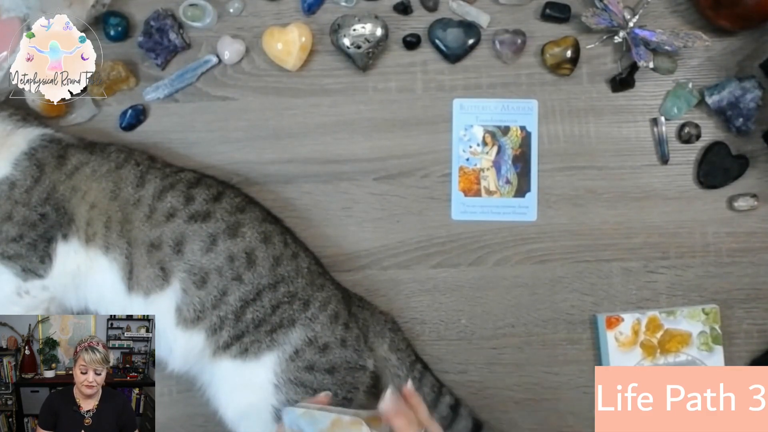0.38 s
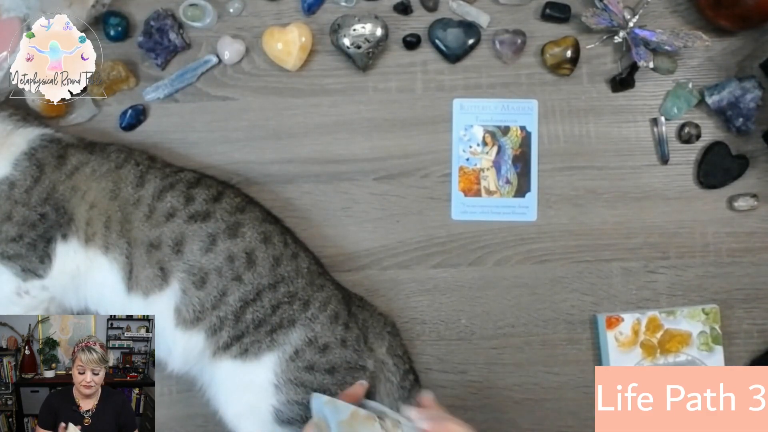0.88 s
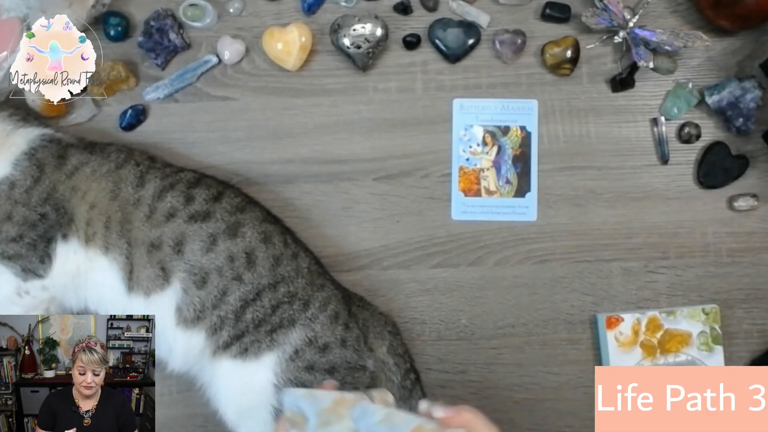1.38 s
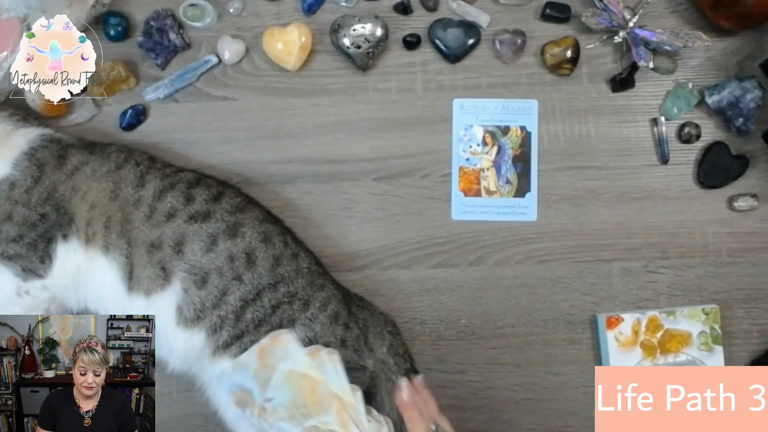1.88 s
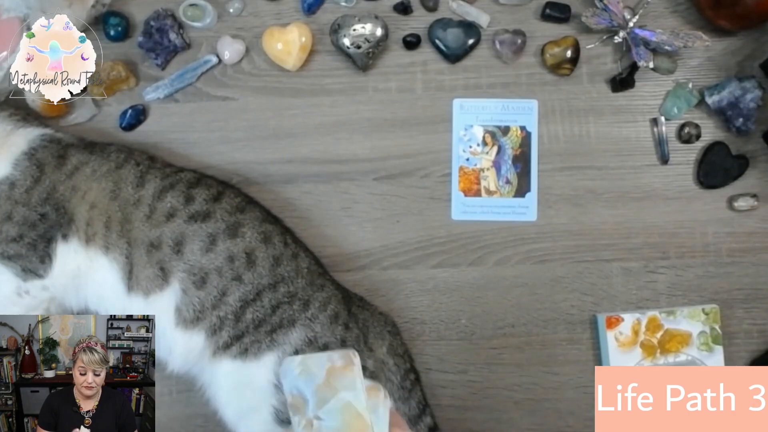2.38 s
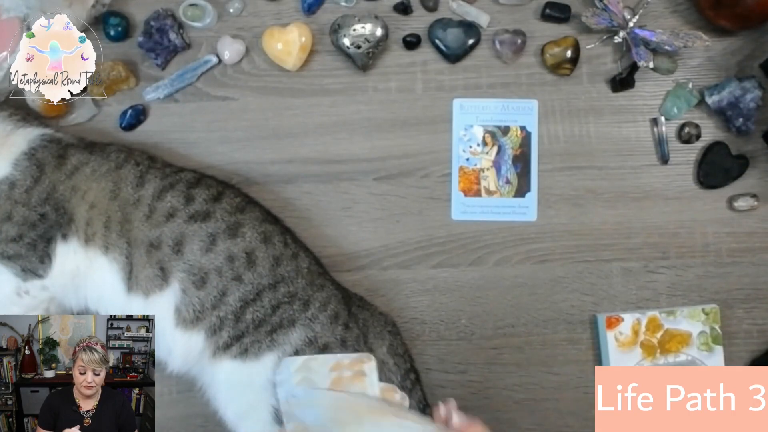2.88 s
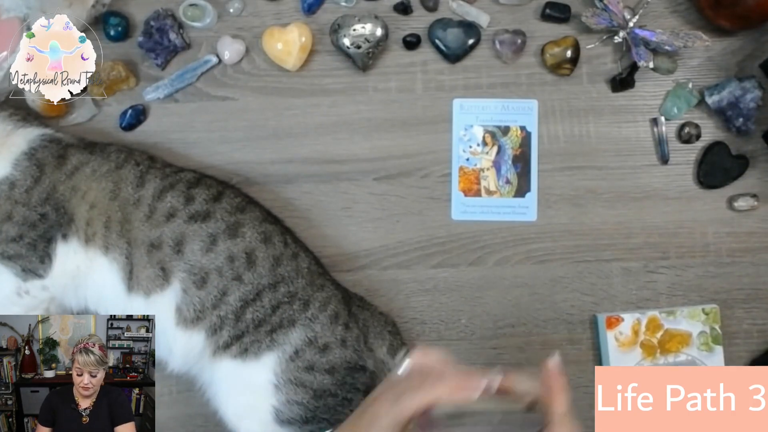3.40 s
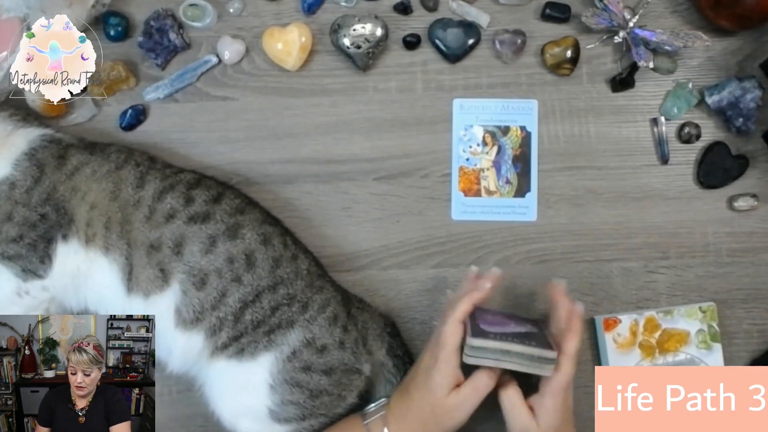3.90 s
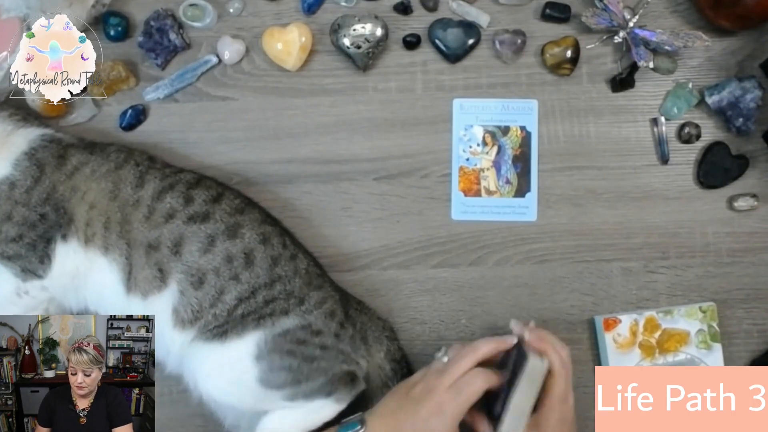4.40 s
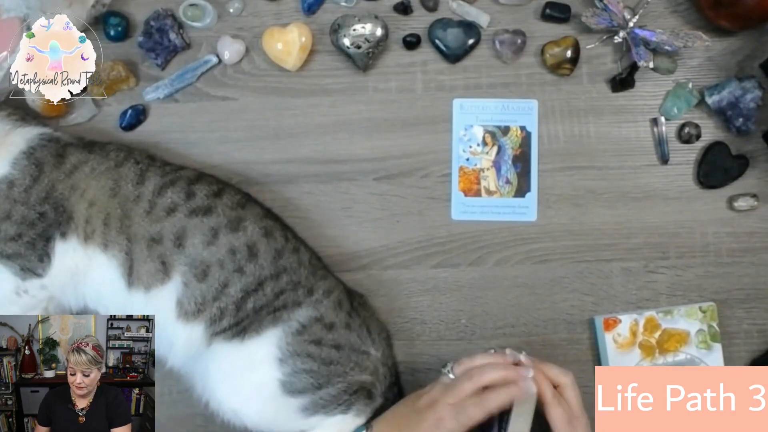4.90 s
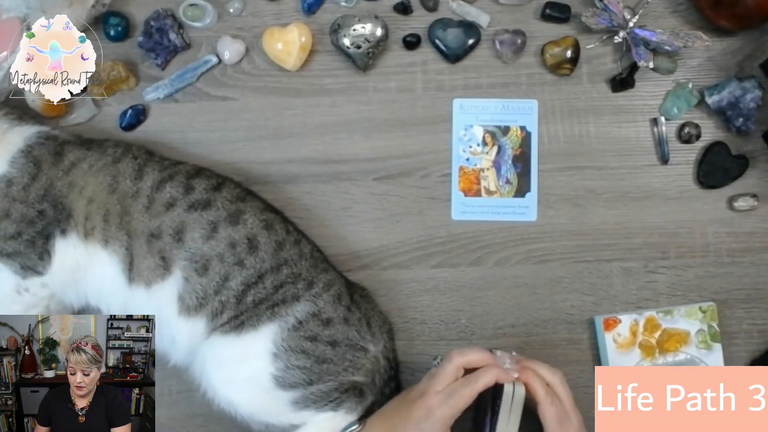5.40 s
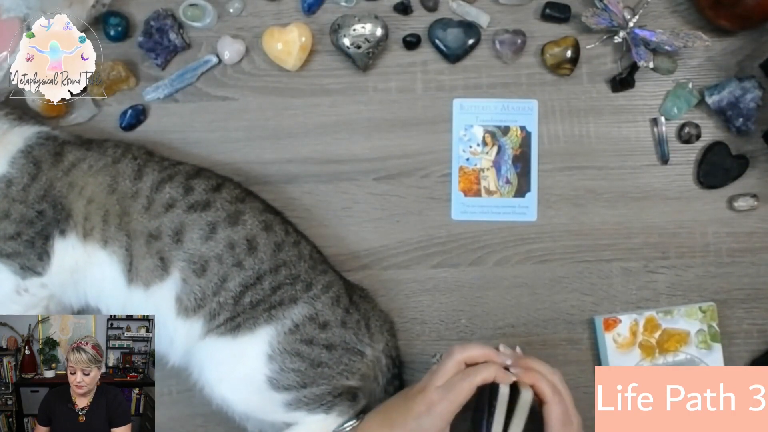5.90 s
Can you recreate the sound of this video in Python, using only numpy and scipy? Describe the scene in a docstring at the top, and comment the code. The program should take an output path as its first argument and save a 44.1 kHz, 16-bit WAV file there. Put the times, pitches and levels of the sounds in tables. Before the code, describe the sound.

Hands rustle and flick a deck of stiff cards, knock it square in a sharp loud burst, then softly tap it down in a quiet room.

```python
"""In a quiet room with hiss and hum, hands draw a deck of stiff cards out of a cloth wrap: shaped noise rustles,
card edges flick and tap as short bursts ring the deck's modes, and a bracelet tinkles with brief fading sines.
At about 3.5 s they knock the deck square in the loudest blows; flicks and scrapes follow close behind.
From about 4.1 s softer knocks set it on the wooden table, which hums on faintly at its middle modes.
At about 5.4 to 5.6 s faint high ticks and small hard clicks ring, made of very short sines."""
import sys
import numpy as np
from scipy import signal
from scipy.fft import rfft, irfft, next_fast_len
from scipy.io import wavfile

SR = 44100
rng = np.random.default_rng(int(sys.argv[2]) if len(sys.argv) > 2 else 0)


def magnitude_from_level(level_db):
    """Linear magnitude for a level in decibels (20 dB per decade)."""
    exponent = np.asarray(level_db, float) / 20
    return 10 ** exponent


def unload_wav(signal):
    """Save mono or channel-first audio to the path in sys.argv[1] as 16-bit WAV at rate SR, clipped to [-1, 1]."""
    wavfile.write(
        sys.argv[1],
        SR,
        np.round(np.clip(np.atleast_2d(signal).T, -1, 1) * 32767).astype(np.int16),
    )


N = 265967   # length in samples, about 6 s
SETTLE_PER_CONTACT = 8.6   # a brief contact settles within this many of its lengths


def curve(table, column):
    """One column of a table, drawn as straight lines over time, at every sample."""
    rows = np.array(table)
    return np.interp(np.arange(N) / SR, rows[:, 0], rows[:, column])


def at_hz(points, hz):
    """Read a spectrum in dB between its points, on a log pitch axis."""
    points = np.array(points)
    return np.interp(np.log(hz), np.log(points[:, 0]), points[:, 1])


def rms_one(x):
    """Scale to an rms (average strength) of 1."""
    return x / np.sqrt(np.mean(x ** 2) + 1e-20)


def drift(rate_hz):
    """A slow random wander around 0 with spread 1, made on every 40th sample and joined by lines."""
    r = np.exp(-80 * np.pi * rate_hz / SR)
    noise = rng.standard_normal(N // 40 + 2002)
    slow = signal.lfilter([1], [1, -2 * r, r * r], noise)[2000:]   # leave out the filter's start
    return np.interp(np.arange(N) / 40, np.arange(len(slow)), rms_one(slow))


def ring(clicks, hz, t60):
    """A unit click sets a sine of height 1 ringing, which falls by 60 dB in t60 seconds."""
    r = magnitude_from_level(-60 / (t60 * SR))
    w = 2 * np.pi * hz / SR
    return signal.lfilter([0, np.sin(w)], [1, -2 * r * np.cos(w), r * r], clicks + 1e-18)


def resonate(clicks, hz, t60):
    """A ring passed once more through its own resonance: soft start, steep skirts."""
    r = magnitude_from_level(-60 / (t60 * SR))
    w = 2 * np.pi * hz / SR
    return signal.lfilter([1 - r * r, 0, r * r - 1], [1, -2 * r * np.cos(w), r * r], ring(clicks, hz, t60))


def colour(x, spectrum):
    """Shape a long noise by a spectrum; rms 1."""
    size = next_fast_len(N)
    hz = np.maximum(np.arange(size // 2 + 1) * SR / size, 1)
    return rms_one(irfft(rfft(x, size) * magnitude_from_level(at_hz(spectrum, hz)), size)[:N])


def grains(per_s, clump_db, smooth):
    """Friction: tiny slips of uneven size that come in clumps, over smooth noise."""
    sizes = magnitude_from_level(2.5 * np.minimum(rng.exponential(1, N), 4)) * rng.standard_normal(N)
    born = rng.random(N) < per_s / SR
    slips = rms_one(sizes * born) + smooth * rng.standard_normal(N)
    return slips * magnitude_from_level(clump_db * drift(12))


def touches(table, contact_s, t60):
    """Soft touches, each ringing one pitch; the length of contact rounds off the start."""
    out = np.zeros(N)
    touch = np.hanning(round(contact_s * SR) + 2)
    t = np.arange(int(t60 * SR)) / SR
    for s, hz, level_db in table:
        fade = np.convolve(magnitude_from_level(level_db - 60 * t / t60), touch / touch.sum())[:len(t)]
        start = round(s * SR)
        out[start:start + len(t)] += fade * np.sin(2 * np.pi * hz * t)
    return out


def room_tone():
    """Hiss and low rumble are shaped noise; the faint hum is a sine that wavers in level and phase."""
    # colour of the hiss: f/Hz, relative level per Hz/dB
    hiss_spectrum = [(12, -38.5), (20, 3.5), (49, -2.5), (163, -21), (182, -25), (422, -30.5), (513, -25.5),
                     (949, -23.5), (1610, -29.5), (1860, -27), (2800, -29.5), (3250, -28), (3700, -32),
                     (5230, -40), (12400, -43.5), (16000, -52)]
    # the table shakes under the hands: t/s, level/dB
    shaking = [(3.6, -68), (3.8, -57), (4.0, -63), (4.2, -59.5), (4.4, -59.5), (4.5, -91)]
    hiss_db, hum_hz, hum_db = -56, 158.4, -71
    phase = 2 * np.pi * hum_hz * np.arange(N) / SR + 2.5 * drift(2.5)
    hum = magnitude_from_level(hum_db + 1.5 * drift(1.5)) * np.sin(phase)
    low_noise = colour(rng.standard_normal(N), [(12, -5.0), (30, 7.5), (80, -32.0), (200, -89.5)])
    rumble = magnitude_from_level(curve(shaking, 1)) * low_noise
    waver = magnitude_from_level(.6 * drift(1.3))
    hiss = magnitude_from_level(hiss_db) * waver * colour(rng.standard_normal(N), hiss_spectrum)
    return hiss + hum + rumble


def room(x):
    """A dense diffuse echo tail of noise after the first bounce; the treble dies sooner."""
    low_t60_s, treble_t60_s, split_hz, first_bounce_s = 0.19, 0.089, 6200, 0.002
    t = np.arange(SR // 2) / SR
    dull, bright = rng.standard_normal((2, len(t)))
    low, high = (signal.butter(2, split_hz, kind, fs=SR) for kind in ("low", "high"))
    tail = signal.lfilter(*low, dull) * magnitude_from_level(-60 * t / low_t60_s)
    tail += signal.lfilter(*high, bright) * magnitude_from_level(-60 * t / treble_t60_s)
    tail *= (t > first_bounce_s) * np.cos(np.pi * t) ** 2   # nothing is left after half a second
    return signal.fftconvolve(x, tail / np.sqrt(np.sum(tail ** 2)))[:N]


def bracelet():
    """Bracelet links touch and ring briefly, fluttering as they rub."""
    # links touching: t/s, f/Hz, level before the flutter/dB
    links = [(.034, 1970, -47), (.078, 1980, -50), (.701, 1840, -50), (2.476, 1900, -39.5),
             (3.508, 2090, -48), (4.115, 1906, -45), (4.352, 2084, -46), (4.422, 1860, -50),
             (4.911, 1934, -51), (5.665, 2040, -54)]
    flutter = .6 + .5 * drift(150)
    return touches(links, contact_s=.009, t60=0.056) * flutter


def coating():
    """Faint high ticks, perhaps the card coating parting: each is a very short sine."""
    # ticks: t/s, f/Hz, level/dB
    ticks = [(3.861, 12870, -45.5), (4.339, 6085, -49), (5.389, 8290, -56), (5.405, 9830, -45),
             (5.4055, 6500, -50), (5.427, 12300, -52), (5.463, 3460, -54), (5.484, 3020, -50),
             (5.474, 12560, -44), (5.479, 10970, -54.5), (5.5225, 12000, -50)]
    return touches(ticks, contact_s=0.00031, t60=0.0025)


def nail():
    """A fingernail or ring clicks on something small and hard; each click rings the same few modes."""
    # clicks: t/s, level/dB
    clicks = [(5.5187, -55), (5.5226, -49), (5.581, -60.5)]
    # what each click rings: f/Hz, level over the click's own/dB
    modes = [(3950, 6), (6150, -1), (8100, -5)]
    table = [(s, hz, db + mode_db) for s, db in clicks for hz, mode_db in modes]
    return touches(table, contact_s=0.00033, t60=0.0094)


def thumps():
    """The heel of the hand or a fingertip meets the table, ringing one pitch, mostly a low one."""
    # thumps: t/s, f/Hz, level/dB
    hand_blows = [(.148, 105, -37), (.212, 94, -43), (3.30, 81, -43), (3.61, 47.5, -37), (4.12, 109.4, -42),
                  (5.763, 448.5, -47)]
    return touches(hand_blows, contact_s=0.0029, t60=0.055)


def strokes():
    """Each stroke swells and fades softly: returns the gains of cloth and sheen (the fine treble)."""
    # strokes of cloth and skin over the cards: t at full height/s, level/dB, rise/ms
    stroke_table = [(.185, -56, 23), (0.223, -55.5, 51), (.43, -60, 17), (.47, -67.5, 52),
                    (0.52, -54.5, 28), (.6, -54, 6.2), (0.634, -47.5, 11), (.81, -70.5, 15), (.9, -66, 32),
                    (1.337, -63, 28), (1.47, -59, 14), (1.641, -54.5, 27.6), (1.758, -59, 16),
                    (1.942, -56, 12), (2.023, -50.5, 7.9), (2.119, -62, 15), (2.49, -63.5, 28),
                    (2.558, -51.5, 8.1), (2.92, -57, 53), (3.038, -51, 8.9), (3.133, -53, 7.5),
                    (3.241, -53, 16), (3.298, -51.5, 47), (3.369, -48.5, 4.7), (3.48, -69, 45),
                    (4.11, -63.5, 25), (4.262, -64, 18), (5.93, -69, 49)]
    fall_share = 0.79   # fading time as a share of the rise
    edge = 1.4   # 2 is a bell curve; less leaves long soft skirts
    sheen_db, sheen_follows = -69.5, .35   # sheen of a -60 dB stroke; it grows less than the stroke does
    ms, cloth, sheen = np.arange(N) * 1000 / SR, np.zeros(N), np.zeros(N)
    for s, level_db, rise in stroke_table:
        near = slice(max(round((s - .3) * SR), 0), round((s + .3) * SR))
        late = ms[near] - 1000 * s
        width = np.where(late < 0, rise, fall_share * rise)
        stroke = np.exp(-np.abs(late / width) ** edge)
        # strokes that overlap add in power
        cloth[near] += magnitude_from_level(level_db) ** 2 * stroke
        sheen[near] += magnitude_from_level(sheen_db + sheen_follows * (level_db + 60)) ** 2 * stroke
    return np.sqrt(cloth), np.sqrt(sheen)


def patchy(x):
    """Folds of cloth brighten and dull: overlapping half-octave bands each swell and sink on their own."""
    swing_db, rate_hz = 2.6, 16
    size = next_fast_len(N)
    hz = np.arange(1, size // 2 + 2) * SR / size
    steps = 2 * np.log2(hz / 700)   # half octaves above 700 Hz
    spectrum = rfft(x, size)
    out = np.zeros(N)
    for k in range(11):
        band = irfft(spectrum * np.maximum(1 - np.abs(steps - k), 0), size)[:N]
        out += band * magnitude_from_level(swing_db * drift(rate_hz))
    return rms_one(out)


def brushing(cloth, sheen):
    """Cloth and skin slip over the cards: one grainy noise in two colours, each with its own gain."""
    # colour of the rustle: f/Hz, relative level per Hz/dB
    cloth_spectrum = [(600, -28), (2000, -2.5), (4500, 2), (7000, -1.5), (10000, -22.5)]
    # colour of the fine treble on top: f/Hz, relative level per Hz/dB
    sheen_spectrum = [(6000, -29.5), (8500, 15), (12500, 3.5), (15500, -13)]
    slips = patchy(grains(1500, 2.0, .5))
    return cloth * colour(slips, cloth_spectrum) + sheen * colour(slips, sheen_spectrum)


def rubbing(cloth):
    """The deck and hands drag over the table: grainy friction noise, a dull part and a card scrape."""
    # slow dragging: t/s, dull drag level/dB, card scrape level/dB
    drag_levels = [(0, -61.5, -76), (.55, -58.5, -67.5), (.75, -68.5, -91), (1.55, -60.5, -74),
                   (2.3, -69.5, -70.5), (2.74, -62, -79), (2.94, -56.5, -66), (3.18, -62.5, -69),
                   (3.22, -60.5, -45), (3.36, -49.5, -68), (3.43, -72, -98), (3.59, -57, -39),
                   (3.64, -39.5, -55), (3.71, -37, -40), (3.76, -49, -39), (3.82, -49, -54),
                   (3.95, -52, -39), (4.02, -56, -58), (4.11, -48.5, -61.5), (4.28, -60.5, -73.5),
                   (5.06, -60, -68.5), (5.44, -69, -86), (6.03, -64.5, -63.5)]
    # colour of the dull drag: f/Hz, relative level per Hz/dB
    drag_spectrum = [(80, -1), (300, 7), (850, -1), (1600, -5.5), (3000, -55.5)]
    # colour of the card scrape: f/Hz, relative level per Hz/dB
    scrape_spectrum = [(700, -6.5), (1500, -5), (2900, -1.5), (4200, -12), (8000, -50)]
    drag = magnitude_from_level(curve(drag_levels, 1)) * colour(grains(2200, 3.0, .6), drag_spectrum)
    scrape_gain = magnitude_from_level(curve(drag_levels, 2)) + magnitude_from_level(-7.5) * cloth   # every stroke also scrapes a card
    return drag + scrape_gain * colour(grains(1200, 3.0, 0.5), scrape_spectrum)


def snaps():
    """Single card edges flick free: brief contacts that hardly move the table and settle fast."""
    # flicks: t/s, edge level/dB, deck body level/dB, tick level/dB
    flick_table = [(0.5745, -47, -74, -48), (0.617, -32.5, -39, -47), (0.666, -41.5, -47, -48),
                   (0.996, -48, -41.5, -53), (1.1447, -35.5, -49, -46), (1.1715, -21, -30, -30),
                   (1.176, -28.5, -56, -47), (1.9777, -42, -86, -70), (2.1984, -57, -47, -51),
                   (2.303, -42.5, -54, -45), (2.5604, -49, -39, -43), (2.6468, -54, -81, -50.5),
                   (2.762, -44, -49, -57),(2.769, -27.5, -38, -40), (2.775, -29, -41, -33),
                   (2.7888, -21, -24, -27), (2.864, -30, -38.5, -25), (2.9967, -51, -49, -68),
                   (3.164, -49, -53, -66), (3.1873, -57, -42.5, -70), (3.209, -38, -41, -56),
                   (3.239, -64, -33, -50), (3.301, -57, -45, -39), (3.4119, -46, -44.5, -60),
                   (3.7139, -14, -22.5, -40), (3.7731, -22, -26, -46), (3.783, -23, -32, -58),
                   (3.837, -40, -27, -71), (3.8467, -16, -24.5, -85), (3.87, -43, -28, -78),
                   (3.895, -12.5, -18, -43), (3.9148, -37, -32, -58), (3.925, -24, -32, -70),
                   (3.9317, -16.5, -30, -45), (3.957, -34.5, -29, -54), (4.2, -45, -50, -72),
                   (4.2205, -54, -55, -54)]
    contact_ms, thump_over_body_db, settle_db = 0.9, -26, -26
    settle_ms = min(13, SETTLE_PER_CONTACT * contact_ms)
    return [(s, body + thump_over_body_db, body, edge, tick, contact_ms, settle_ms, settle_db)
            for s, edge, body, tick in flick_table]


def knocks():
    """The deck knocks on hand and table; its cards keep shifting for a while afterwards."""
    # knocks: t/s, edge level/dB, deck body level/dB, table thump level/dB, contact/ms
    knock_table = [(0.1483, -28, -41.5, -62, 2.9), (0.2114, -39.5, -43, -53, 8.2),
                   (0.4253, -52, -40, -79, 2.4), (0.9372, -45, -40, -51, 21), (1.149, -32, -41.5, -73, 2.8),
                   (1.4576, -40.5, -50, -64, 10), (1.47, -37.5, -47.5, -93, 3.5),
                   (1.52, -57, -45.5, -64, 5.8), (1.7446, -43.5, -39.5, -37.5, 3.1),
                   (1.765, -49, -47, -44, 4), (3.038, -48, -49.5, -37.5, 0.9),
                   (3.2156, -42, -36.5, -44.5, 2.6), (3.2855, -45, -36, -55, 0.83),
                   (3.353, -43, -37, -48, 9.6), (3.3715, -37.5, -33.5, -30.5, 0.7),
                   (3.5419, -16.5, -9, -20, 7.1), (3.5485, -4.5, -14.5, -25.5, 2.6),
                   (3.5577, -26, -14.5, -19.5, 5.1), (3.585, -18, -25, -48, 4.3),
                   (3.6007, -2.5, -9.5, -25, 0.95), (3.6029, 6, -1, -40, 2.5),
                   (3.6582, -20, -15, -48, 0.96), (3.671, -19, -15.5, -36, 2.7),
                   (3.682, -28, -23.5, -62, 3.2), (3.7273, -12.5, -29.5, -30, 2.6),
                   (3.7339, -17.5, -14.5, -57, 5.3), (3.7446, -18, -28, -33, 11),
                   (4.114, -47, -40, -50, 1.4), (4.193, -46.5, -40, -51, 6.2),
                   (4.222, -47.5, -43.5, -57.5, 8.6), (4.4618, -30, -29, -29.5, 5.5),
                   (4.495, -34.5, -41, -49, 3.3), (4.517, -47.5, -43, -47.5, 4),
                   (4.643, -40.5, -35, -51, 11.5), (4.6794, -24, -33, -44.5, 10),
                   (4.834, -41, -58.5, -69, 5.3), (4.8915, -42, -40.5, -71, 2.4)]
    # knocks dull as the hands close round the deck: t/s, tick level over deck body/dB
    crispness = [(0, -3), (3.4, -7), (3.55, -17), (3.62, -22), (4.2, -21.5), (4.45, -54)]
    settle_db = -22.5
    rows = []
    for s, edge, body, thump, contact_ms in knock_table:
        tick = body + np.interp(s, *np.transpose(crispness))
        settle_ms = min(30, SETTLE_PER_CONTACT * contact_ms)
        rows.append((s, thump, body, edge, tick, contact_ms, settle_ms, settle_db))
    return rows


def taps():
    """Each contact is a flurry of card edges landing, swelling fast and dying; all ring the same modes."""
    # where the four contact levels (thump, body, edge, tick) apply: f/Hz
    level_hz = [250, 850, 2600, 7000]
    # modes of deck and table top: f/Hz, relative level/dB
    deck_modes = [(120, -11.5), (170, -2), (290, -4.5), (430, -12.5), (520, -3), (650, -3), (855, -3.5),
                  (1080, -5.5), (1300, -5.5), (1540, -5.5), (1920, -6), (2330, -2.5), (2600, -9), (2880, 5),
                  (3300, 1.5), (3900, 2), (4900, 1.5), (6000, -4), (7300, 3), (9000, -5.5), (11000, -3.5),
                  (13500, -7.5)]
    ring_cycles, longest_ring_s = 8, .016   # card damps every mode fast
    # below this pitch the shifting cards would fade; every mode listed lies above it and gets their full rustle
    full_shift_hz = 100
    snap_pitch_up = 1.055   # a lone card edge speaks higher: its four levels apply at higher pitches
    # after a knock the table top rings on, faintly, at its middle modes
    top_ring_s, top_ring_db, top_from_hz, top_cut_hz = .08, -10, 520, 990
    flicks, blows = snaps(), knocks()
    rows, out = np.array(flicks + blows), np.zeros(N)
    levels_db = rows[:, 1:5]
    contact_ms, settle_ms, settle_db = rows[:, 5:6], rows[:, 6:7], rows[:, 7:8]
    knocked = np.repeat([False, True], [len(flicks), len(blows)])[:, None]
    lowered = np.where(knocked[:, 0], 1, 1 / snap_pitch_up)

    t = np.arange(4096)
    places = np.round(rows[:, :1] * SR).astype(int) + t
    size = (len(rows), len(t))
    edges = rng.standard_normal(size) * rng.exponential(1, size) ** 2   # card edges land unevenly
    strength_db = 1.5 * rng.standard_normal((len(rows), len(deck_modes)))
    spent = t / (np.clip(contact_ms, .2, 15) * SR / 1000)   # time in contact lengths
    swell = 1 - np.exp(-4.0 * spent)
    shifting = magnitude_from_level(settle_db) * np.exp(-t * 1000 / SR / settle_ms)
    bins_hz = np.fft.rfftfreq(len(t), 1 / SR)

    for k, (hz, mode_db) in enumerate(deck_modes):
        t60 = min(ring_cycles / hz, longest_ring_s)
        shape = swell * (np.exp(-spent) + shifting * min(hz / full_shift_hz, 1) ** 2)
        # a flick strikes all modes at once, a knock each in its own pattern
        flurry = np.where(knocked, np.roll(edges, k, axis=0), (-1) ** k * edges) * shape
        # blend the four contact levels at this pitch
        read_at = np.log(hz * lowered)
        weight = np.transpose([np.interp(read_at, np.log(level_hz), unit) for unit in np.eye(len(level_hz))])
        level_db = np.sum(levels_db * weight, axis=1) + mode_db + strength_db[:, k]
        # even out the part of the flurry that this mode takes up
        heard = 1 / (1 + ((bins_hz - hz) * t60) ** 2) ** 2
        taken = np.sqrt(np.abs(rfft(flurry)) ** 2 @ heard / heard.sum())
        hits = flurry * (magnitude_from_level(level_db) / taken)[:, None]
        on_deck = np.bincount(places.ravel(), hits.ravel(), N)
        on_top = np.bincount(places.ravel(), (hits * knocked).ravel(), N)
        reach = min(hz / top_from_hz, 1) ** 2 / (1 + (hz / top_cut_hz) ** 4)
        out += resonate(on_deck, hz, t60)
        out += magnitude_from_level(top_ring_db) * reach * ring(on_top, hz, top_ring_s)
    return out


def scene():
    """Hands at the table, their echo, and the room's own sound."""
    echo_db = -11.5
    cloth, sheen = strokes()
    hands = taps() + rubbing(cloth) + brushing(cloth, sheen)
    hands += bracelet() + nail() + coating() + thumps()
    return (hands + magnitude_from_level(echo_db) * room(hands) + room_tone())[None]


def low_pass(x):
    """Removes everything above the highest recorded frequency."""
    return signal.sosfilt(signal.butter(12, 15900, fs=SR, output="sos"), x)


def record(dry):
    """The whole mix is turned down by about 5 dB and its loudest peaks are rounded a little."""
    mix = 1.015 * np.tanh(dry / 1.762)
    return low_pass(mix)


dry = scene()
out = record(dry)
unload_wav(out)
```